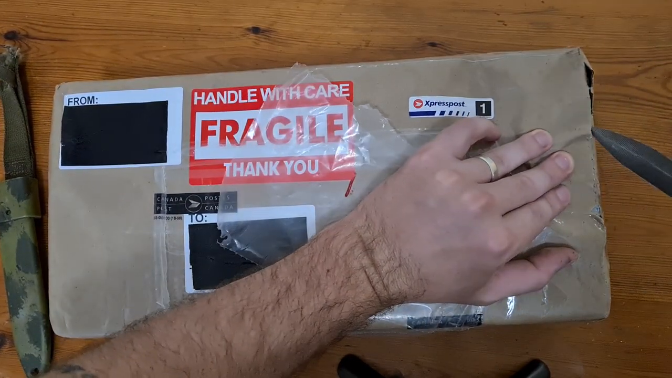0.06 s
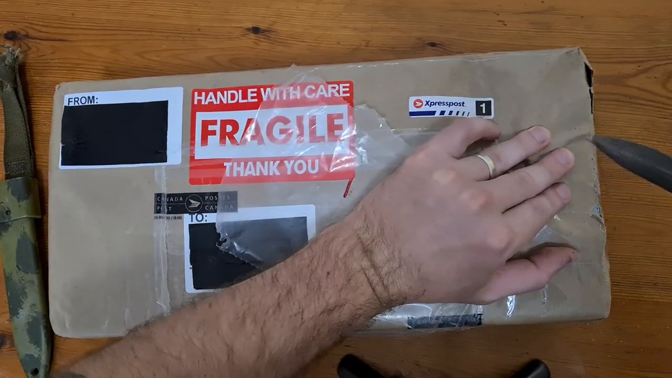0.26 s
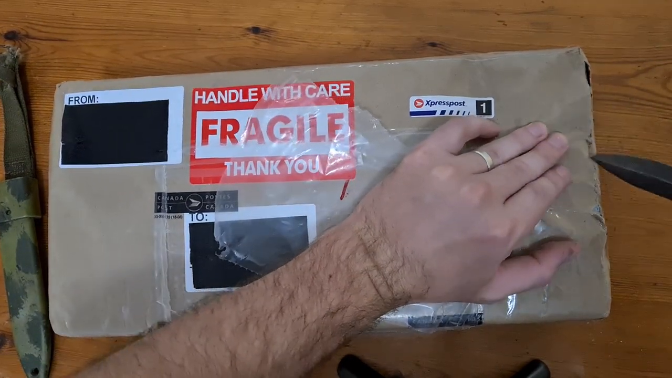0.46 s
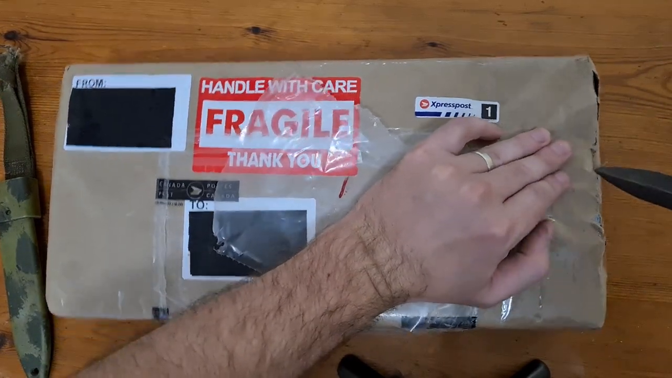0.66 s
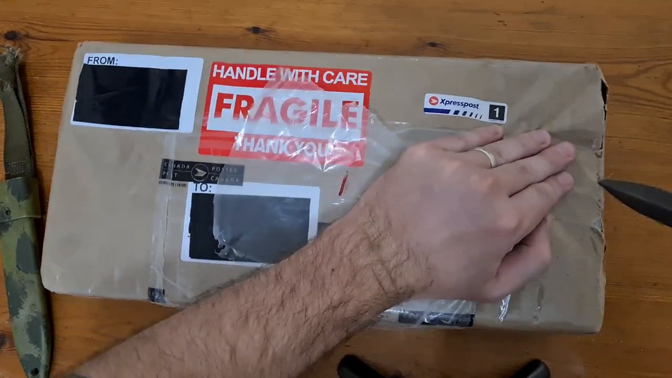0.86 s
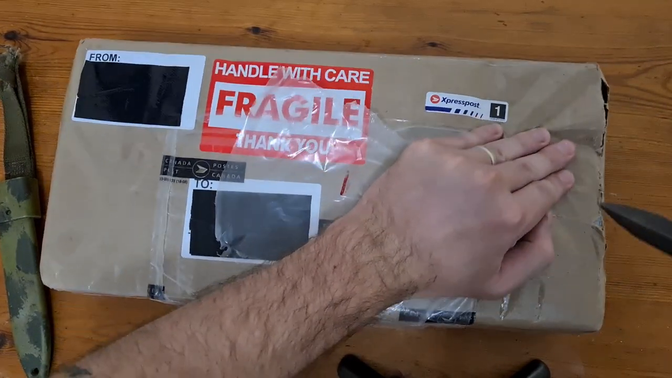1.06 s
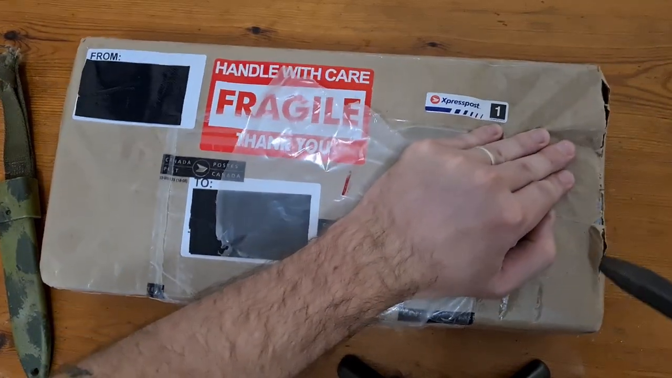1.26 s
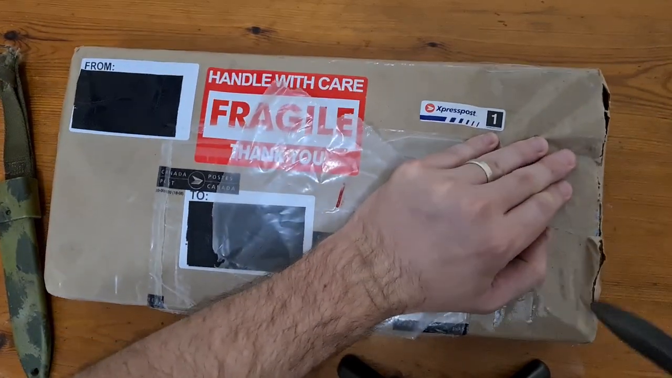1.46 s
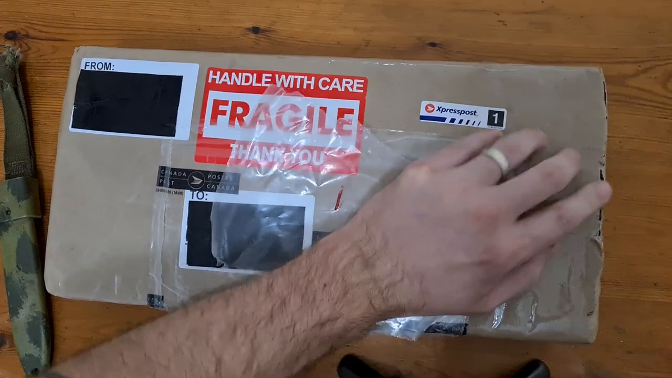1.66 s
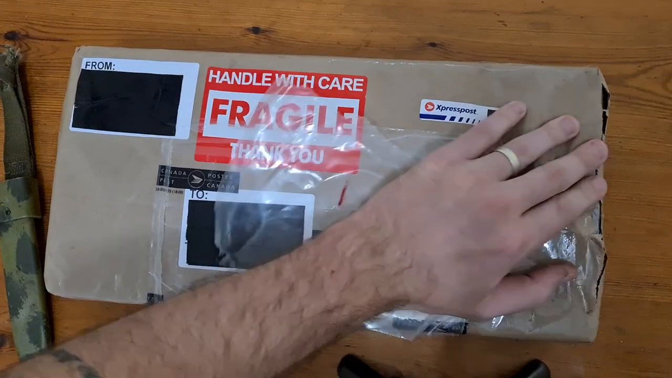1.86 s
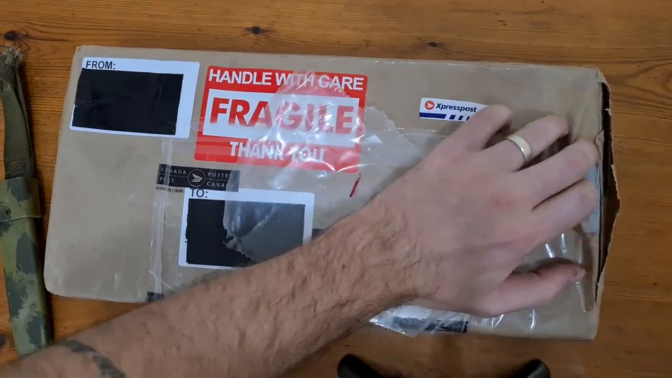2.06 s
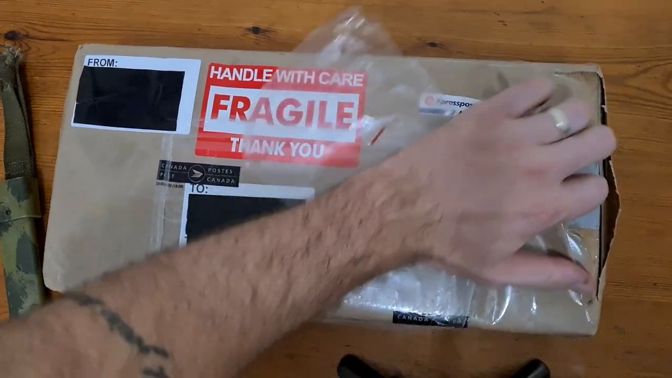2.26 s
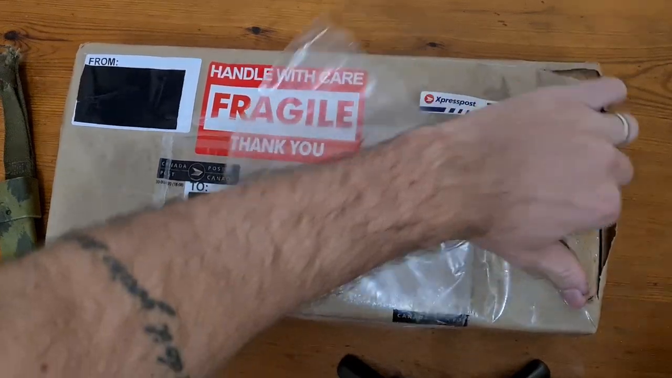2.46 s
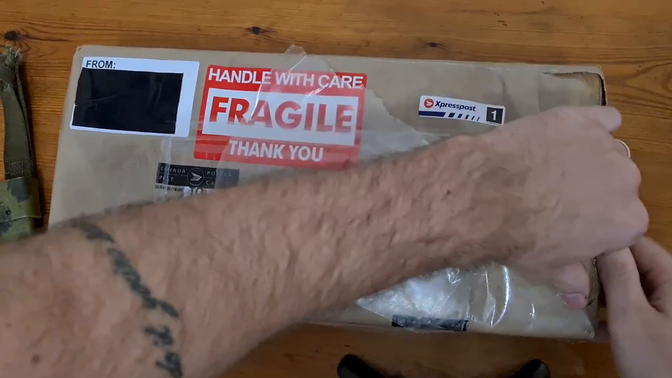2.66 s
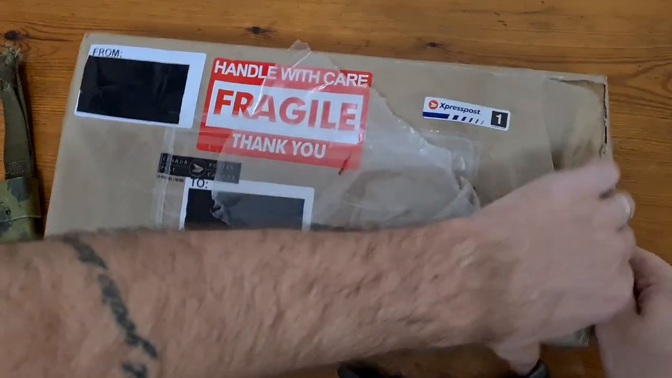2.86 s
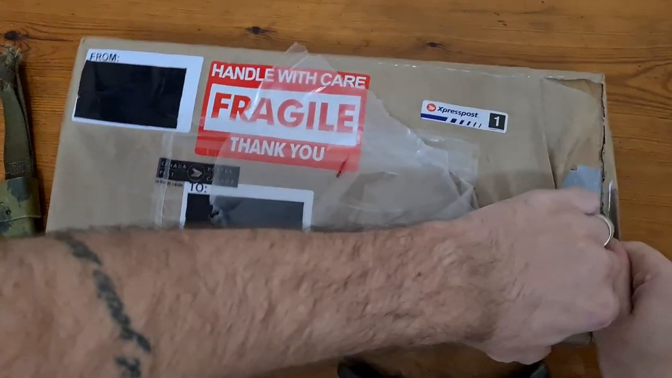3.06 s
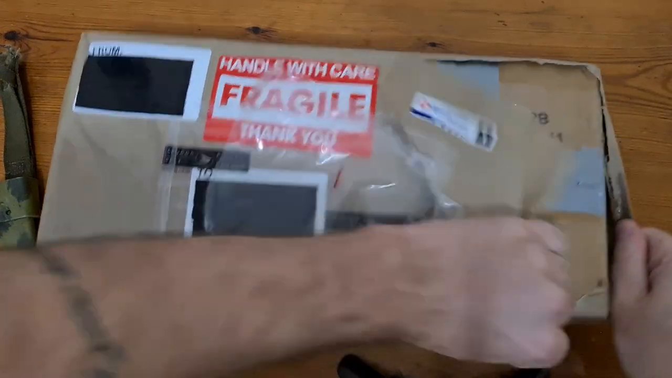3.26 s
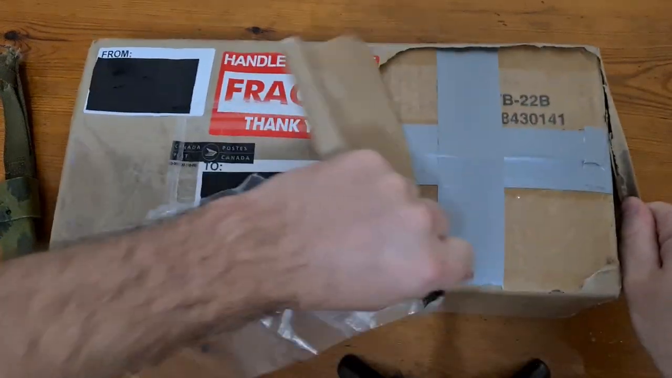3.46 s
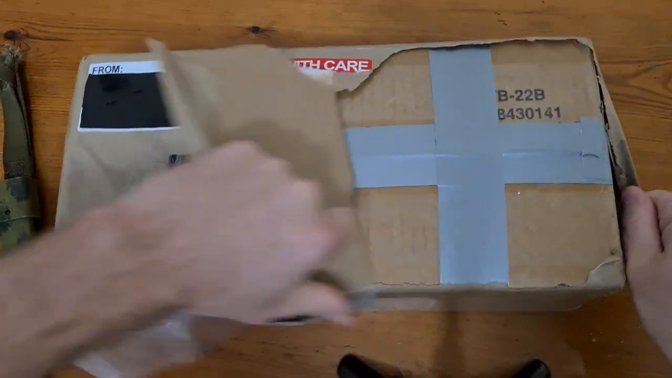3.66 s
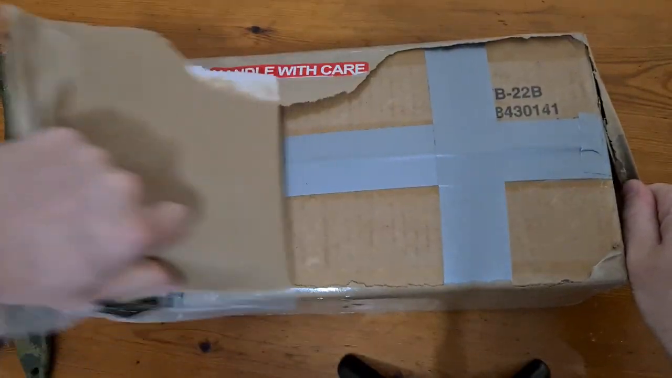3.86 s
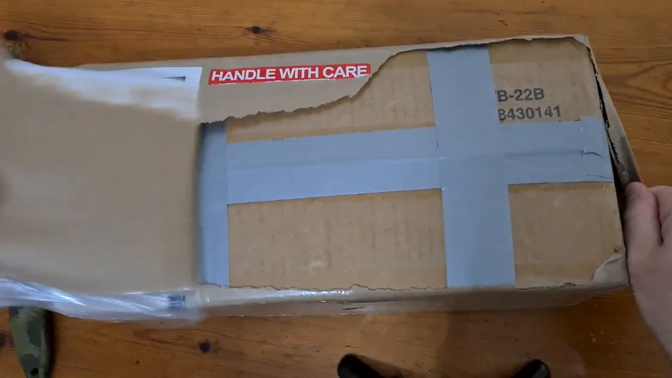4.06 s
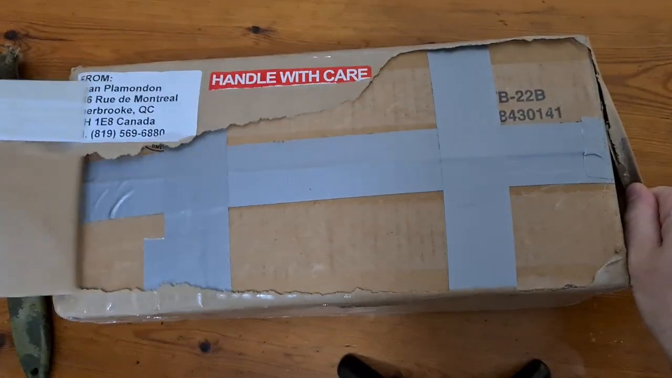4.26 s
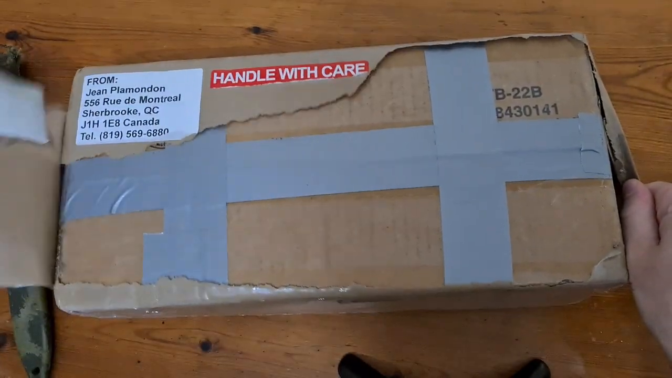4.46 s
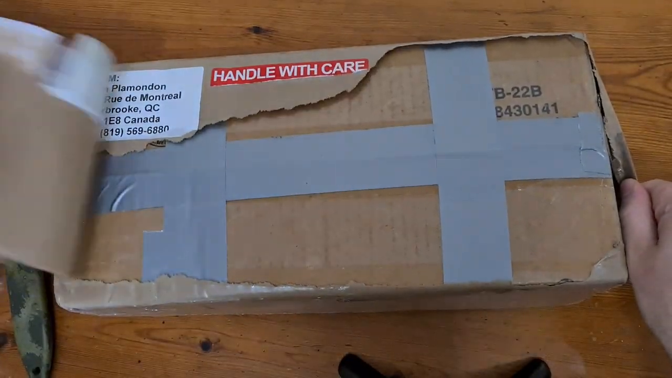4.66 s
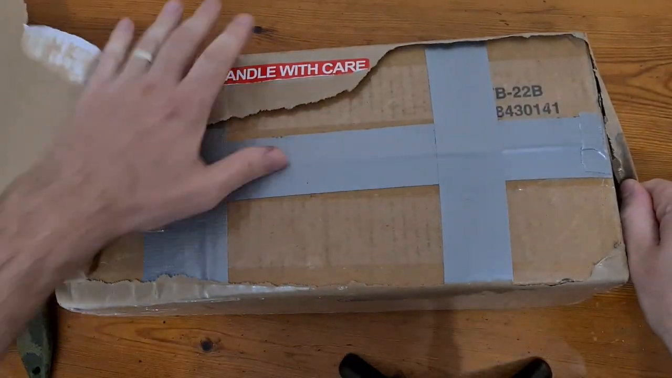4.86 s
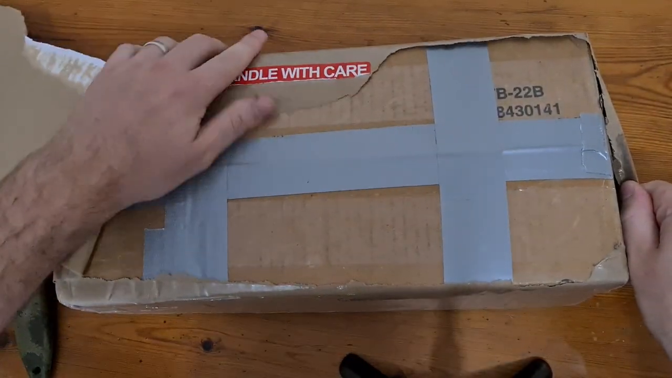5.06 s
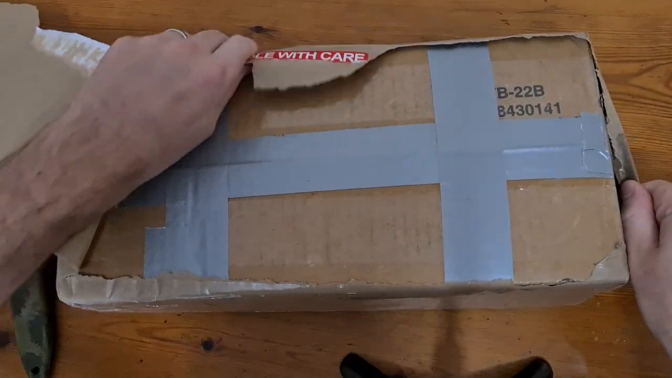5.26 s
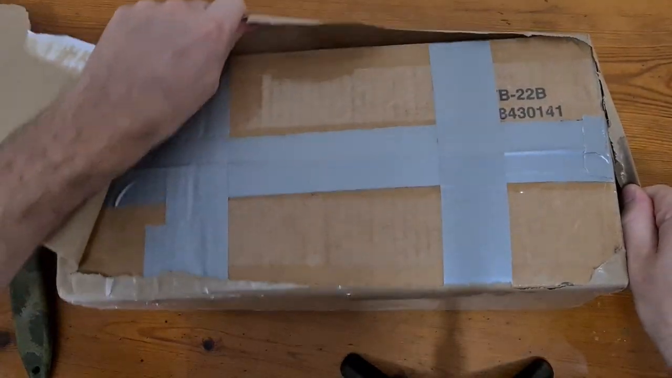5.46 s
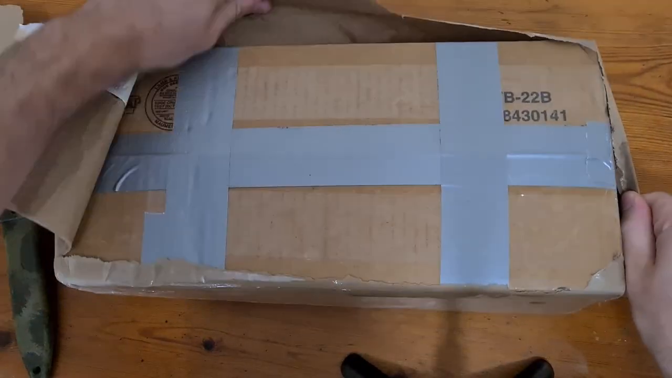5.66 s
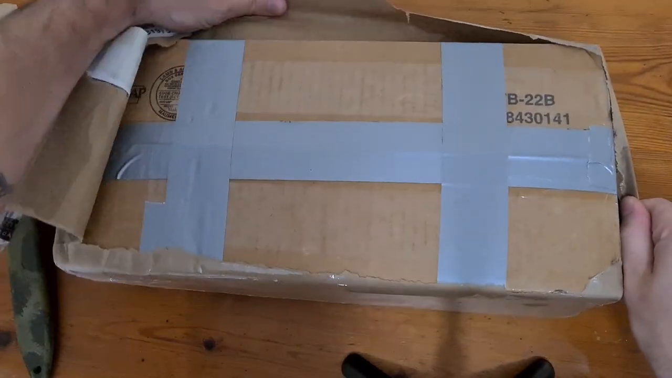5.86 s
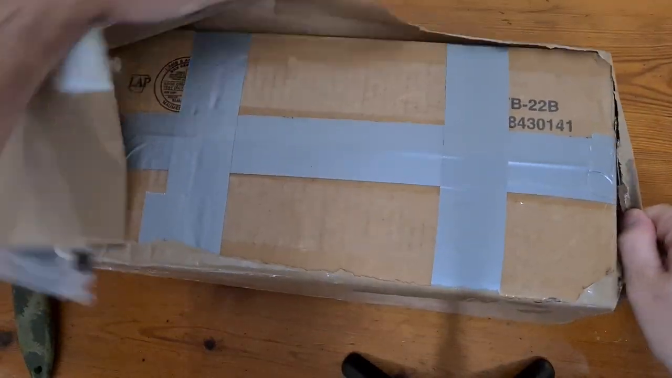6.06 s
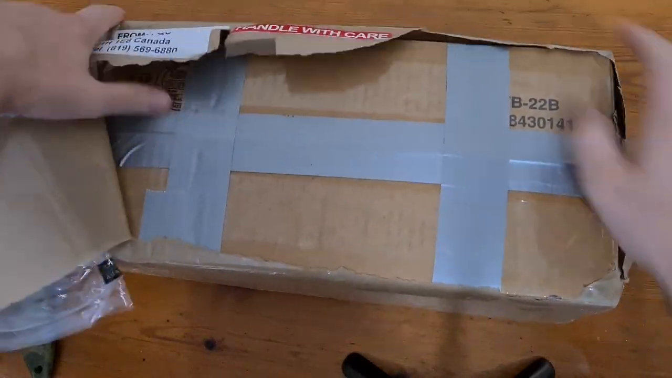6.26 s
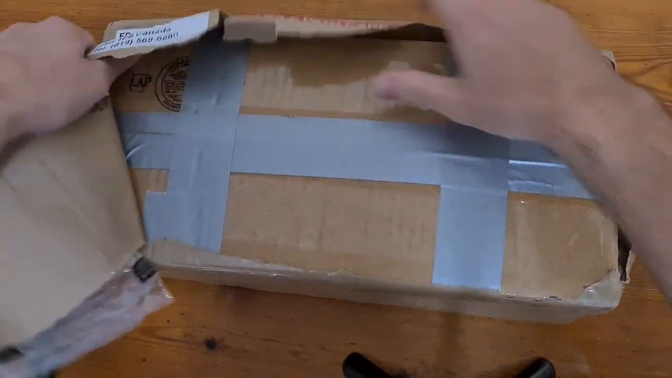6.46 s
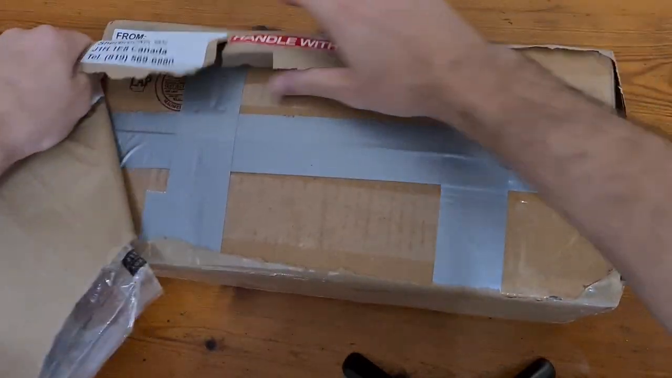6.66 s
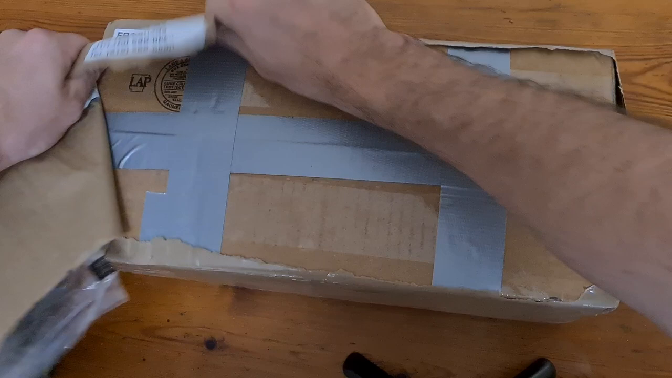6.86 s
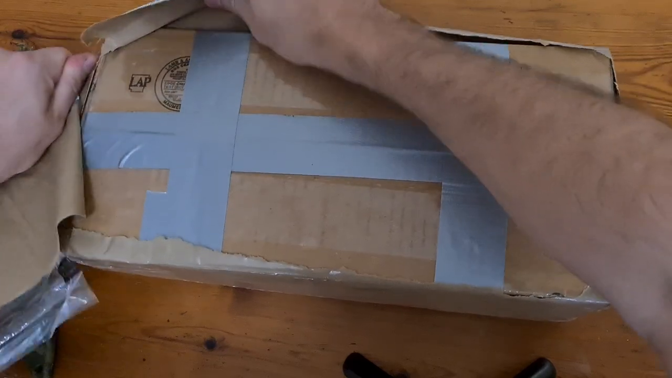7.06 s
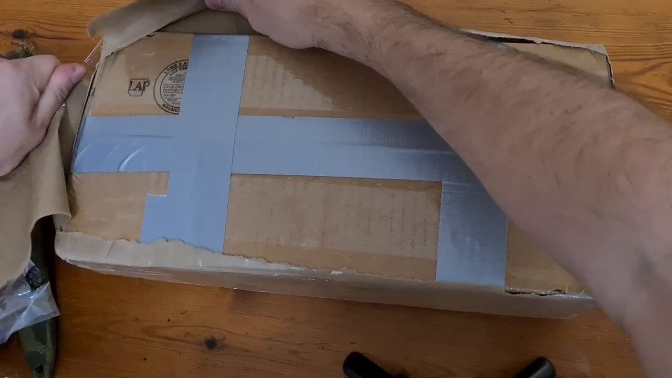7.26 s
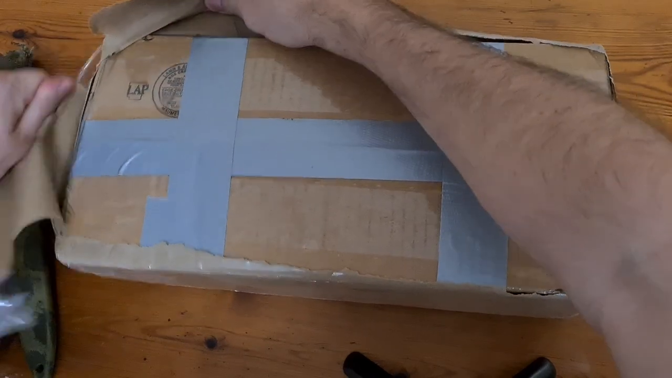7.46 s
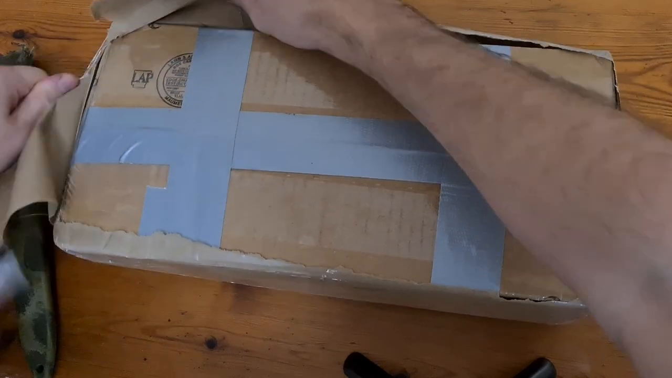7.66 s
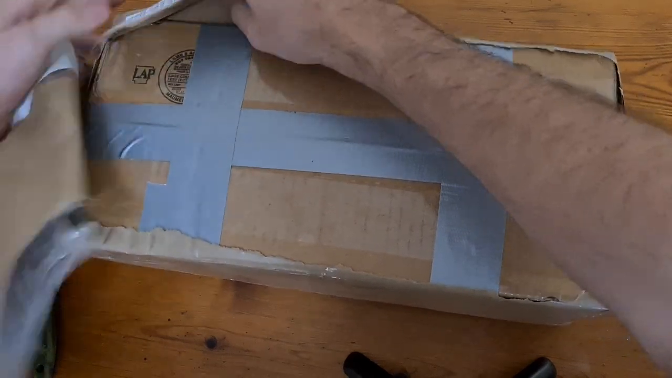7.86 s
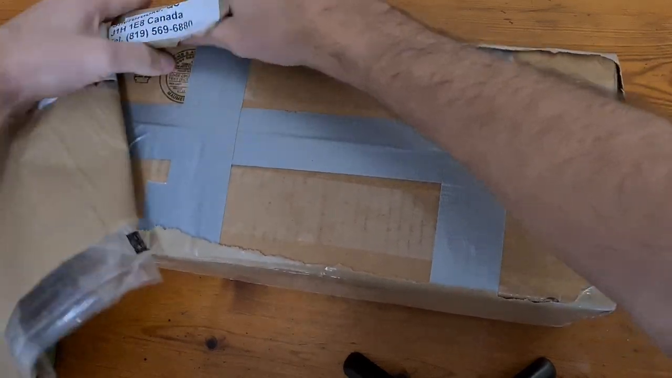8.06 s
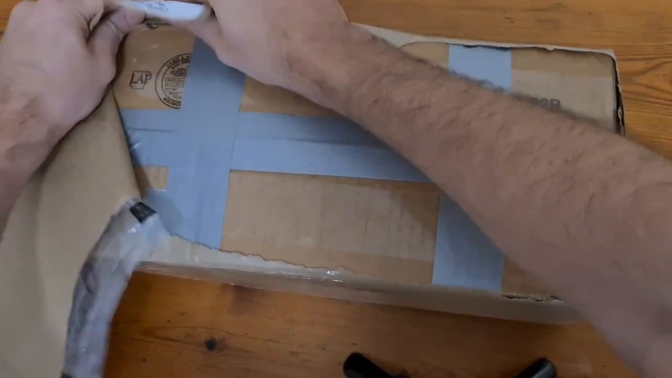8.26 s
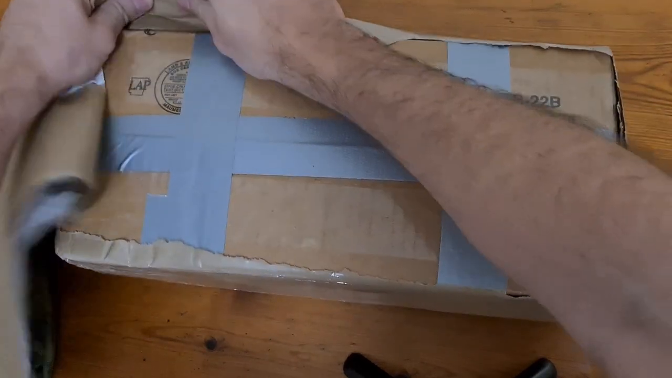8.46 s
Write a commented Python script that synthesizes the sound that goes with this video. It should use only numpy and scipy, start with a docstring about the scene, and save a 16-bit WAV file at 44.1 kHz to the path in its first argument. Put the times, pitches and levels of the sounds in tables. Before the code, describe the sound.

A small, quiet room with faint hush and short echo, heard close in stereo. From 0.3 to 1.1 s, very soft paper ticks and faint knocks. At about 1.27 and 1.5 s, brief crisp slitting cuts with sharp snaps and a low shift of the box. Light crinkles near 1.9 and 2.25 s. At 2.42 s a knife drops on the wooden table: a solid thump, quick bounces and rattle to 2.6 s, with small high steel clinks. Quiet rustle, then hard cracks from 3.13 s open into a long, loud, coarse paper rip, hissing and fluttering until 4.5 s over hollow box rumble. A quieter pause with slight rubbing follows. Short crumples and snaps burst at 5.3 to 5.6 s, smaller ones around 5.9 to 6.7 s. From 7.0 to 7.6 s dense, bright tape and paper cracks with tears and box bumps, then looser crackles at 7.9 and rustling past 8.3 s.

```python
"""A parcel in brown paper and tape is opened on a wooden table in a small room: creases crack, paper crackles.
A knife slits one end and is dropped on the table; the wrapping is ripped across the box in one long pull,
then gripped, creased and torn further in short bursts while the cardboard box bumps about.
Paper and tape are crowds of tiny ringing fractures; cracks, thumps and rubs are shaped noise and short
ringing tones; the box rumbles in low noise, and a faint hush and the room's echo surround it all."""
import sys
import numpy as np
from scipy import signal
from scipy.fft import rfft, irfft, next_fast_len
from scipy.io import wavfile
from scipy.ndimage import uniform_filter1d

SR = 44100
rng = np.random.default_rng(int(sys.argv[2]) if len(sys.argv) > 2 else 0)


def master_out(mix):
    """Clip the mix to full scale and print it as 16-bit PCM to the path in sys.argv[1]."""
    frames = np.transpose(np.atleast_2d(mix))
    ceiling = np.clip(frames, -1, 1)
    pcm = np.round(ceiling * 32767).astype(np.int16)
    wavfile.write(sys.argv[1], SR, pcm)


N = 375732  # length in samples

# All levels are relative: each source trims its own before mixing.
# Spectra. Each row: frequency in Hz, level in dB per Hz.
# The quiet room.
HUSH = [(12, -29), (20, -17), (58, -14), (91, -17), (422, -20.5), (698, -28.5), (2820, -31), (6720, -39),
        (9140, -41), (16000, -55)]
# The low rumble of the shifting box, and its hollow drumming.
RUMBLE = [(20, -41), (45, -23), (62, -3.5), (77, 10), (86, 3.5), (98, 5.5), (125, -3), (150, -22),
          (300, -40.5)]
DRUM = [(90, -40), (150, -24), (200, -2), (280, -12), (335, 2), (420, -5), (600, -17), (1000, -23)]
# Crinkling paper, crinkling plastic tape, the bending sheet, and a surface sliding.
CRINKLE = [(500, -23), (1200, 4.5), (2000, -6), (2700, 7.5), (3500, 9), (4800, -0.5), (7000, 6.5),
           (9000, -17.5), (16000, -3)]
TAPE = [(1500, -29), (3500, 0), (7000, 2), (10000, 6), (16000, 1.5)]
FLEX = [(90, -13.5), (170, -6.5), (340, -1.5), (500, -2), (750, -5), (900, -6.5), (1240, 3), (1600, -7.5),
        (2200, -7), (4000, -25.5)]
SLIDING = [(500, -30), (1200, -13), (2000, 6), (3500, 1), (6000, -1), (10000, -9), (16000, -21)]
# The sizzle on top of a crack.
SIZZLE = [(3000, -52), (6000, -0.5), (9000, 6.5), (16000, 2.5)]
# Coarse fibres, fine fibres and the fluttering flap in the long pull.
FIBRES = [(500, -10), (1500, -4.5), (2000, 1.5), (2700, -4.5), (3400, 2), (4800, -5), (6200, -3),
          (9000, -22)]
FINE_FIBRES = [(4000, -22), (5400, -5.5), (6300, 2.5), (7300, -1.5), (11000, 0), (16000, -5)]
FLUTTER = [(250, -32), (550, -15.5), (750, -1), (900, -0.5), (1100, 4.5), (1350, -0.5), (1700, -5.5),
           (2400, -9.5), (4000, -12)]

# Sound around a pitch. Each row: multiple of the pitch, level in dB per Hz.
# A crack, the pop of a panel, a rubbed panel, a thump on the table top, and a tear.
CRACK_SHAPE = [(.15, -38), (.42, -4.5), (.62, -3.5), (.85, -0.5), (1, 3), (1.25, -2.5), (2.2, -6.5),
               (3.2, -8.5), (6, -40.5)]
POP_SHAPE = [(.12, -16), (.3, -0.5), (.7, -4), (1, 4), (1.4, -7.5), (2.2, -16.5), (4, -38)]
RUB_SHAPE = [(.4, -6), (.75, 1.5), (1, 6), (1.4, -6.5), (2.4, -25.5)]
WOOD = [(.12, -19), (.3, -2), (.55, -15), (1, 1.5), (1.35, -10), (1.9, -9), (3, -12.5), (5, -16.5),
        (10, -38), (20, -44), (40, -72)]
TEAR_SHAPE = [(.15, -18), (.4, -12), (.75, 0), (1, -1), (1.35, -10), (2.2, -8.5), (5, -19)]

# Ringing tones of the box, table and blade.
# Each row: frequency in Hz, level in dB, time to fade by 60 dB in seconds.
BOX = [(76, -13, 0.124), (124.4, 3, 0.13), (180, -2, 0.23), (243.5, 3.5, 0.15), (338, 0, 0.21),
       (402, 21, 0.018), (560, -3.5, 0.2)]
TABLE = [(92, -6, .14), (198, -5, 0.16), (253, -6, 0.18), (413, -4, 0.16), (450, -6, 0.15), (598, -8, 0.1),
         (781, -7, 0.13), (845, -5, 0.15), (1010, -10, 0.19), (1094, -9, 0.17)]
BLADE = [(1879, -9, .13), (2519, -15, .15), (3085, -13, .22), (3620, -18, .12), (4011, -13, .15),
         (4560, -16, .09), (4980, -11, .06)]

# Hands knocking the hollow box. Each row: start in seconds, level in dB, pitch of the struck panel in Hz.
KNOCKS = [(0.344, -51, 372), (0.439, -59, 350), (0.514, -47.5, 328), (0.971, -42.5, 305), (1.093, -44, 244),
          (1.703, -40, 310), (1.75, -34.5, 88), (2.25, -33.5, 143), (3.24, -25, 290), (3.385, -27, 372),
          (3.51, -24.5, 400), (4.236, -28, 343), (4.961, -47, 119), (5.202, -45.5, 248), (5.319, -28, 239),
          (5.587, -30.5, 604), (6.15, -28, 420), (6.604, -34.5, 563), (6.719, -33, 576), (7.0, -28, 425),
          (7.931, -35, 420), (8.118, -37, 190), (8.24, -42, 346)]
# The box is shoved over the table. Each row: start in seconds, length in seconds, level in dB.
SHOVES = [(.5, 0.066, -51.5), (.97, 0.029, -51), (1.27, 0.095, -39), (1.54, 0.037, -41),
          (1.755, 0.0068, -40), (1.86, 0.0082, -44.5), (2.26, 0.06, -61), (2.46, 0.1, -38),
          (2.95, 0.025, -48), (3.27, 0.21, -33.5), (3.53, 0.016, -28), (4.2, 0.088, -39.5),
          (4.58, 0.024, -49.5), (5.32, 0.025, -46), (6.35, 0.039, -53), (7.05, 0.046, -48),
          (8.11, 0.028, -47)]
# Taut tape and stiff creases cracking.
# Each row: time in seconds, level in dB, pitch in Hz, treble in dB relative to the crack.
CRACKS = [(.258, -48, 3500, -26), (.302, -38.5, 3500, -14), (.342, -35.5, 6000, -6), (.389, -35, 4100, -9),
          (.397, -29.5, 6500, -11), (.428, -48.5, 4400, -13), (.452, -40, 3670, -22),
          (.479, -34, 6200, -29), (.527, -29.5, 6250, -10), (.597, -47, 3000, -22), (.612, -38, 3280, -15),
          (.842, -45, 4500, -6), (.848, -40.5, 4360, 3), (.893, -39, 3500, -23), (.926, -35.5, 4630, -20),
          (.941, -52, 4500, -10), (.955, -36, 3600, -17), (.972, -43, 3480, -5), (1.059, -41, 3540, -6.5),
          (1.211, -46, 4500, -12), (1.258, -15, 3540, -18), (1.285, -15, 6550, -25),
          (1.534, -25.5, 6200, -13), (1.621, -26, 5600, -29), (1.631, -24, 3460, -13),
          (1.908, -27, 3000, -28), (2.059, -29.5, 6260, -18), (2.266, -20, 4900, -8.5),
          (2.323, -24.5, 6400, -13), (2.826, -29.5, 1960, -15), (2.875, -29.5, 6170, -9),
          (2.948, -34.5, 1960, -3), (2.989, -23, 4480, -0.5), (3.098, -29, 1900, -3),
          (3.133, -12, 4350, -10), (3.141, -24.5, 4200, -1), (3.19, -11, 3080, -15),
          (3.217, -7.5, 5960, -12), (3.239, -3.5, 3690, -14), (3.251, -3.5, 3630, -15),
          (3.263, -12, 3960, 1.5), (3.284, -13, 2600, -4), (3.312, -4, 5480, -31), (3.457, -10, 6200, -26),
          (3.487, -16, 6850, -19.5), (3.51, -7.5, 6020, -24), (3.557, -7.5, 6200, -28),
          (4.169, -4, 6250, -14), (5.246, -23.5, 3000, -37), (5.309, -14.5, 1710, -31),
          (5.32, -5.5, 4730, -30), (5.436, -6.5, 2550, -18), (5.587, -8.5, 3200, -31),
          (5.618, -11, 3280, -29.5), (6.097, -28, 7120, 0.5), (6.287, -16, 6690, -28),
          (6.722, -16.5, 6100, -12), (7.021, -10, 5470, -4.5), (7.046, -10, 6100, -6.5),
          (7.072, -4.5, 3270, -14), (7.089, 0, 8000, -29), (7.175, -13.5, 3520, -4),
          (7.184, -16, 3400, -14.5), (7.2, -4.5, 3330, -10.5), (7.235, -12.5, 3400, -15.5),
          (7.267, -8.5, 2000, -7), (7.346, -24, 3290, -5.5), (7.394, -10, 5100, -11.5),
          (7.422, -29, 5800, -7), (7.433, -24, 3550, 0.5), (7.447, -8.5, 3580, -9), (7.46, -6, 3580, -18.5),
          (7.486, -24, 3480, -22), (7.496, -15, 3500, -26), (7.509, -12, 3280, -20.5),
          (7.516, -9.5, 3560, -15.5), (7.526, -9.5, 3540, -15), (7.553, -11, 5750, -8),
          (7.563, -8.5, 2090, -6.5), (7.567, -10.5, 3470, -4.5), (7.587, -7.5, 3540, -10.5),
          (7.78, -26, 3460, -12.5), (7.84, -41, 3300, -15), (7.852, -23.5, 6000, -10),
          (7.877, -12, 4800, -24), (7.894, -12.5, 3560, -19), (7.932, -18, 3330, -27.5),
          (8.029, -23.5, 3460, -5), (8.373, -13.5, 3120, -12), (8.46, -13, 6560, -12)]
# Paper panels buckling. Each row: time in seconds, level of the pop in dB, pitch of the pop in Hz.
BUCKLES = [(0.6615, -51, 1290), (.787, -56.5, 1830), (1.099, -47.5, 1150), (1.397, -45, 1260),
           (1.4921, -36, 1260), (1.702, -41.5, 1170), (2.2418, -33, 1330), (2.3511, -30, 2330),
           (2.94, -43.5, 1030), (3.018, -40.5, 1090), (3.0976, -46.5, 394), (3.6177, -24, 1420),
           (3.834, -28.5, 1050), (3.895, -23.5, 1050), (4.137, -21, 1070), (4.181, -25, 1030),
           (4.598, -35.5, 1050), (4.9884, -45, 1750), (5.202, -38.5, 1270), (5.436, -22, 1370),
           (5.4586, -27, 900), (5.692, -36.5, 905), (5.78, -36.5, 2050), (5.814, -41, 1400),
           (5.843, -41, 1220), (5.943, -22, 1177), (6.1319, -29, 1020), (6.15, -32, 1230),
           (6.288, -33.5, 580), (6.61, -37, 710), (6.722, -43.5, 696), (6.977, -49, 1180),
           (7.003, -34, 1080), (7.089, -31.5, 880), (7.268, -25.5, 1140), (7.379, -41, 1160),
           (7.5701, -19.5, 1264), (7.802, -48.5, 1300), (7.823, -35, 1320), (7.9176, -31.5, 1130),
           (7.932, -26, 605), (8.224, -32, 1290), (8.241, -24.5, 1166), (8.325, -33, 1190),
           (8.349, -25.5, 1200), (8.511, -29, 1170)]
# A hand or the blade moves over the wrapping. Each row: start in seconds, length in seconds,
# paper crinkle in dB, sheet flexing in dB, plastic tape in dB.
STROKES = [(.33, 0.31, -63, -61, -64), (.85, 0.1, -63, -58.5, -72), (.97, 0.1, -78, -54.5, -55),
           (1.272, 0.029, -35, -31, -33), (1.49, 0.067, -56, -39, -37.5), (1.59, 0.047, -63, -48.5, -40.5),
           (1.69, 0.061, -72, -68, -74), (1.89, 0.023, -44.5, -48, -60), (2.15, 0.038, -42, -49, -40),
           (2.24, 0.18, -33.5, -36.5, -36), (2.56, 1, -54, -57, -64.5), (2.87, .34, -45, -53, -52),
           (4.53, 0.1, -40.5, -42.5, -62), (4.68, 0.14, -51.5, -53, -61), (4.96, 0.057, -47, -45.5, -77),
           (5.03, 0.22, -51.5, -57.5, -63), (5.25, 0.065, -40, -50, -62.5), (5.32, 0.01, -27, -27, -49.5),
           (5.41, 0.078, -30, -29, -39.5), (5.585, 0.032, -36, -33.5, -51), (5.735, 0.031, -37, -34.5, -37),
           (5.79, .33, -41.5, -42.5, -51.5), (6.15, 0.048, -37.5, -36, -34.5),
           (6.24, 0.045, -38, -40.5, -45), (6.33, 0.236, -48, -50.5, -49), (6.6, 0.11, -40.5, -41.5, -46),
           (6.76, 0.18, -40.5, -47.5, -45), (6.98, 0.15, -44.5, -32, -29), (7.19, 0.076, -26, -43, -30),
           (7.44, 0.071, -36, -71, -21), (7.56, 0.086, -43.5, -38, -30), (7.77, 0.18, -41, -39, -39),
           (7.87, 0.043, -50, -30, -33.5), (7.99, 0.31, -46.5, -47, -48.5),
           (8.19, 0.055, -35, -37.5, -32.5), (8.33, 0.48, -41.5, -38.5, -40)]
# A palm drags over the hollow box.
# Each row: start in seconds, length in seconds, level in dB, pitch of the rubbed panel in Hz.
RUBS = [(.99, 0.067, -60, 330), (4.564, 0.019, -42.5, 527), (4.682, 0.15, -67, 400),
        (4.959, 0.014, -55, 300), (5.038, 0.18, -55, 340), (5.217, .08, -52, 298), (5.573, 0.092, -39, 540),
        (5.69, 0.2, -52, 400), (6.16, 0.06, -43.5, 254), (7.893, 0.029, -38, 557)]
# The knife touches the box, then lands on the table and rocks. Each row: time in seconds, wood in dB,
# pitch of the thump in Hz, steel in dB, ring of the tip in dB, pitch of the tip in Hz.
DROP = [(1.099, -68, 400, -58, -43, 6550), (2.415, -11, 450, -50, -60, 6520),
        (2.426, -15.5, 219, -28, -45, 6520), (2.432, -13, 480, -16.5, -19, 6540),
        (2.442, -16.5, 660, -26.5, -30, 6520), (2.487, -19.5, 440, -29, -55, 6520),
        (2.509, -16, 243, -36, -55, 6520), (2.520, -14.5, 258, -24, -42, 6520),
        (2.556, -17, 476, -22.5, -25, 6240), (2.625, -32.5, 430, -53, -48, 6240)]
# The handle rattles on the table between the bounces. Each row: time in seconds, level in dB.
RATTLE = [(2.418, -30.5), (2.48, -30.5), (2.52, -36), (2.58, -42.5), (2.62, -56)]
# Short cuts, tears and crumples. Each row: start in seconds, length in seconds, level in dB, pitch in Hz.
TEARS = [(1.278, 0.066, -36, 3920), (1.48, 0.062, -37.5, 5640), (1.482, 0.029, -42, 1390),
         (1.591, 0.054, -52, 5000), (3.231, 0.03, -31, 3880), (3.654, 0.068, -25, 3450),
         (4.205, 0.025, -21, 6530), (4.287, 0.055, -24, 3550), (5.403, 0.032, -25, 3250),
         (5.415, 0.082, -40, 1400), (5.591, 0.018, -34, 2100), (5.736, 0.057, -40, 2300),
         (6.979, 0.012, -27.5, 5600), (7.041, 0.023, -25.5, 6200), (7.064, 0.066, -30.5, 3080),
         (7.204, 0.062, -32.5, 2860), (7.283, 0.043, -45, 2290), (7.484, 0.046, -44, 3700),
         (7.564, 0.056, -30, 3100), (7.886, 0.049, -51.5, 2320)]
# The long pull. Each row: time in seconds, effort in dB, fine fibres in dB relative to the effort.
PULL = [(3.22, -25, -19), (3.25, -16.5, -7), (3.35, -27, -3.5), (3.41, -29, -9), (3.47, -20, -6.5),
        (3.62, -22, -1.5), (3.72, -22, -1.5), (3.9, -23, 2.5), (4.1, -21.5, 4), (4.2, -19, 1.5),
        (4.33, -18.5, -1), (4.41, -24, 2), (4.47, -23, -2.5), (4.52, -54, -4)]
# The freed flap's ring. Each row: time in seconds, pitch in Hz, flutter in dB relative to the pull.
FLAP = [(3.25, 1375, -9.5), (3.54, 1510, -15), (3.62, 1245, -1.5), (3.8, 1180, 2), (4.1, 1065, 0.5),
        (4.15, 1115, 2.5), (4.25, 1180, -8.5), (4.33, 1144, -8)]
# The tear crosses an end of the box, which drums harder; heard only for times within the pull.
# Each entry: time in seconds.
EDGES_S = [2.4, 4.33]
# How alike left and right are. Each row: frequency in Hz, likeness (1 is identical).
ALIKE = [(100, 0.96), (300, 0.98), (600, 0.8), (1200, 0.059), (3000, 0.02), (10000, 0.072)]
# The room's echo. Each row: frequency in Hz, time to fade by 60 dB in seconds.
ROOM = [(100, 0.79), (500, 0.44), (2000, 0.53), (6500, 0.37), (14000, 0.36)]
# Colour of the microphone. Each row: frequency in Hz, gain in dB.
MICROPHONE = [(100, 0.5), (4800, 0), (6500, 2.5), (7200, -1), (8200, -7), (9700, -8.5), (12500, -3.5),
              (16000, -6)]

HUSH_DB = -61.5
TOP_HZ = 16150  # nothing is kept from here up
# box rumble relative to the flexing sheet, relative to the pull, and under a resting hand
SHAKE_BY_HAND_DB, SHAKE_BY_PULL_DB, REST_DB = -24, -28.5, -62
# seconds for a move to swell by 60 dB, and to fade by 60 dB
SHOVE_ATTACK_S, SHOVE_T60_S = 0.12, 0.17
STROKE_ATTACK_S, STROKE_T60_S = 0.12, 0.086
CRACK_RISE_S = 0.0011  # for a 0 dB crack at 3.5 kHz; duller ones take longer, small ones are quicker
CRACK_POP_DB, CRACK_POP_HZ = -25.5, 1330  # the panel's pop relative to the crack, and its middle pitch
# the fold's dull crack relative to the pop, its pitch, and its sizzle relative to that crack
BUCKLE_CRACK_DB, BUCKLE_CRACK_HZ, BUCKLE_TREBLE_DB = 7, 1930, -16
TIP_T60_S = 0.19  # time for the knife tip's ring to fade by 60 dB
DRUM_DB, EDGE_DB, EDGE_WIDTH_S = -14, 9.5, 0.049  # drumming in the pull, its boost at an edge, the boost's width
MOVE_S = 0.3  # time in which the moving hands change the room's paths


def amp(db):
    """Turn decibels into a plain multiplier."""
    return 10 ** (np.asarray(db) / 20)


def unit(x):
    """Scale a sound to an average (rms) level of 1."""
    return x / np.sqrt(np.mean(x ** 2) + 1e-20)


def along(points, hz):
    """Read a (Hz, value) table at any frequency, on a log axis."""
    f, v = np.transpose(points)
    return np.interp(np.log(hz + 1), np.log(f + 1), v)


def around(shape, pitch):
    """Turn a spectrum given in multiples of a pitch into one in Hz."""
    return [(multiple * pitch, db) for multiple, db in shape]


def gains(rows):
    """One gain per sample for each dB column; silent outside the rows."""
    s, *cols = np.transpose(rows)
    t = np.arange(N) / SR
    inside = (t >= s[0]) & (t <= s[-1])
    gate = uniform_filter1d(inside * 1.0, size=400)
    return [gate * amp(np.interp(t, s, c)) for c in cols]


def gestures(rows, attack_s, t60):
    """One gain per sample for each dB column of (start, length, dB, ..): moves swell, hold and die away."""
    power = np.zeros((len(rows[0]) - 2, N))
    t = np.arange(-SR // 5, 3 * SR // 5) / SR  # a move is cut off 0.6 s after its start
    for s, length, *db in rows:
        swell_db = 60 * np.minimum(t, 0) / attack_s
        fade_db = 60 * np.maximum(t - length, 0) / t60
        add(power, s + t[0], (amp(db)[:, None] * amp(swell_db - fade_db)) ** 2)
    return np.sqrt(power)


def add(track, s, sound):
    """Mix a sound into the track at time s."""
    part = track[:, max(round(s * SR), 0):][:, :sound.shape[-1]]
    part += sound[..., :part.shape[1]]


def pan(db):
    """Gains that make the left louder than the right by this many dB."""
    return amp([[db / 2], [-db / 2]])


def noise(spectrum, n=N):
    """Coloured stereo noise of rms 1, most alike left and right in the bass."""
    m = next_fast_len(n)
    hz = np.fft.rfftfreq(m, 1 / SR)
    turn = np.arccos(np.clip(along(ALIKE, hz), -1, 1)) / 2
    coloured = rfft(rng.standard_normal((2, m))) * amp(along(spectrum, hz))
    mid, side = irfft(coloured * [np.cos(turn), np.sin(turn)], m)[:, :n]
    return unit(np.array([mid + side, mid - side]))


def grains(rate, spread_db, t60, n=N):
    """Envelope of rms 1: tiny fractures of uneven size at random moments (rate per second), each dying fast."""
    happens = rng.random(n) < rate / SR
    size = amp(spread_db * np.minimum(rng.standard_normal(n), 2)) * happens
    power = signal.lfilter([1], [1, -amp(-60 / (t60 * SR)) ** 2], size ** 2)
    return unit(np.sqrt(power))


def crackle(spectrum, rate, spread_db, cycles, n=N, bend=np.ones_like):
    """Stereo crackle of rms 1: fractures ring briefly at their own pitch, size and place; bend(s) scales pitch."""
    draw = rng.random((int(rate * n / SR), 6))
    start = (draw[:, 0] * n).astype(int)
    # pitches are drawn in proportion to the energy of the spectrum
    grid = np.geomspace(100, TOP_HZ, 400)
    share = np.cumsum(amp(along(spectrum, grid)) ** 2 * grid)
    hz = np.interp(draw[:, 1], share / share[-1], grid) * bend(start / SR)
    size = amp(spread_db * np.minimum(-np.log(1 - draw[:, 2]), 3)) * np.sqrt(hz)
    life = (2 * np.pi * cycles * SR / hz).astype(int) + 1  # in samples
    # lay all fractures end to end: k says which one a sample belongs to
    k = np.repeat(np.arange(len(hz)), life)
    age = np.arange(len(k)) - (np.cumsum(life) - life)[k]
    turns = age * hz[k] / SR
    body = size[k] * turns * np.exp(-turns / cycles)
    lead = hz * 0.00025 * draw[:, 4]  # cycles by which the left microphone leads
    ears = []
    for side in (1, -1):
        loudness = 1 + side * (draw[:, 5] - 0.5)
        phase = draw[:, 3] + side * lead / 2
        ear = loudness[k] * body * np.sin(2 * np.pi * (turns + phase[k]))
        ears.append(np.bincount(start[k] + age, ear, n)[:n])
    return unit(np.array(ears))


def bending(x, depth_db):
    """The sheet keeps changing shape, so its resonances come and go."""
    z = signal.stft(x, nperseg=512)[2]
    field = rng.standard_normal(z.shape[1:])
    for axis in (0, 1):
        field = uniform_filter1d(field, size=7, axis=axis)
    bent = z * unit(amp(depth_db * unit(field)))
    return signal.istft(bent, nperseg=512)[1][:, :x.shape[1]]


def ring(modes, t, scatter_db=1.0):
    """Fading tones of a struck object, at new strengths each time."""
    out = 0
    for hz, db, t60 in modes:
        level = amp(db + scatter_db * rng.standard_normal() - 60 * t / t60)
        out = out + level * np.sin(2 * np.pi * hz * t) * rng.choice([-1, 1])
    return out


def box(flexing):
    """The hollow box rumbles as it shifts, and thuds under the hands; large, low panels ring longest."""
    sway = noise(RUMBLE)
    swing = np.abs(signal.hilbert(sway, next_fast_len(N))[:, :N])
    heave = unit(sway / (swing + 0.86))  # the box sways with a fairly even stroke
    shoved, = gestures(SHOVES, SHOVE_ATTACK_S, SHOVE_T60_S)
    shaken = amp(SHAKE_BY_HAND_DB) * flexing + amp(SHAKE_BY_PULL_DB) * gains(PULL)[0]
    out = np.sqrt(shoved ** 2 + shaken ** 2 + amp(REST_DB) ** 2) * heave
    t = np.arange(SR // 4) / SR
    for s, db, hz in KNOCKS:
        panel = amp(9.5 - 60 * t * hz / 26) * np.sin(2 * np.pi * hz * t)
        drum = amp(6.0 - 60 * t / 0.036) * noise(DRUM, len(t))
        thud = amp(-8.0) * ring(BOX, t) + panel + drum
        add(out, s, amp(db - 7.0) * thud * (1 - np.exp(-t / 0.001)))
    return out


def snaps():
    """A crease strains, then buckles with a crack; the panel beside it pops for a few cycles."""
    out = np.zeros((2, N))
    n, ahead = SR // 25, SR // 100
    since = (np.arange(n) - ahead) / SR  # seconds since the buckle
    t = np.maximum(np.arange(n) - ahead, 0) / SR
    strain = amp(-13.5) * np.exp(-np.abs(since) / 0.0036)  # the first fibres yield just before the buckle

    def burst(rise):
        return t / rise * np.exp(1 - t / rise) + strain

    events = []
    for s, db, hz, treble_db in CRACKS:
        pop_hz = CRACK_POP_HZ * np.exp(0.147 * rng.standard_normal())
        events.append((s, db, hz, treble_db, CRACK_POP_DB, pop_hz))
    for s, db, hz in BUCKLES:
        events.append((s, db + BUCKLE_CRACK_DB, BUCKLE_CRACK_HZ, BUCKLE_TREBLE_DB, -BUCKLE_CRACK_DB, hz))
    for s, db, crack_hz, treble_db, pop_db, pop_hz in events:
        crack = amp(-9.0) * noise(around(CRACK_SHAPE, crack_hz), n)
        crack += amp(treble_db + 2.5) * noise(SIZZLE, n)
        tone = np.sin(2 * np.pi * pop_hz * t)
        panel = amp(-3.0) * tone + amp(-3.5) * noise(around(POP_SHAPE, pop_hz), n)
        rise = CRACK_RISE_S * (3500 / crack_hz) ** 0.098 * amp(db) ** 0.08
        snap = amp(0.5) * crack * burst(rise) + amp(pop_db + 4.5) * panel * burst(0.0016)
        add(out, s - ahead / SR, amp(db) * snap * pan(-2.5 + 1.3 * rng.standard_normal()))
    return out


def handling(crinkle, flexing, plastic):
    """Sliding paper hisses, small creases tick, tape crinkles, and the sheet flexes with duller crumples."""
    # the fingers hold and slip, so creases come in clumps
    grip = uniform_filter1d(grains(rate=150, spread_db=6.5, t60=0.055), size=250)
    ticks = amp(-7.0) * crackle(CRINKLE, rate=900, spread_db=2.0, cycles=0.93)
    crumples = amp(-3.5) * crackle(FLEX, rate=1100, spread_db=3.5, cycles=1.44)
    tape = amp(-0.5) * crackle(TAPE, rate=1100, spread_db=2.0, cycles=0.98)
    paper = crinkle * (grip * ticks + amp(-11.0) * noise(SLIDING))
    bright = paper + plastic * grip * tape
    dull = flexing * (grip * crumples + amp(-10) * noise(FLEX))
    return bright * pan(-5.0) + dull * pan(-0.22)


def rubs():
    """Skin sticks and slips on the papered box; each slip is a soft bump of the panel."""
    out = np.zeros((2, N))
    t = np.arange(SR // 3) / SR
    for s, length, db, hz in RUBS:
        press = np.minimum(t / 0.004, 1) * amp(-60 * np.maximum(t - length, 0) / 0.06)
        slips = grains(rate=130, spread_db=3, t60=0.05, n=len(t))
        add(out, s, amp(db) * press * slips * noise(around(RUB_SHAPE, hz), len(t)))
    return out


def knife():
    """Handle and blade thump the table and rattle; the steel clinks and rings, its tip lower once it lies flat."""
    out = np.zeros((2, N))
    t = np.arange(SR // 3) / SR
    for s, wood_db, hz, steel_db, tip_db, tip_hz in DROP:
        thump = noise(around(WOOD, hz), len(t)) * amp(-60 * t / 0.051)
        wood = amp(-8.0) * ring(TABLE, t, scatter_db=2.0) + thump
        chatter = grains(rate=1100, spread_db=2.5, t60=0.014, n=len(t))
        scrape = amp(-2 - 60 * t / 0.022) * noise(SLIDING, len(t))
        steel = amp(-6.0) * chatter * ring(BLADE, t, scatter_db=2.5) + scrape
        tip = amp(tip_db - 17 - 60 * t / TIP_T60_S) * chatter * np.sin(2 * np.pi * tip_hz * t)
        metal = amp(steel_db) * steel + tip
        hit = amp(wood_db) * wood * pan(-2.6) + metal * pan(-8.0)
        add(out, s, hit * (1 - np.exp(-t / 0.0005)))
    taps = rng.standard_normal(N) * (rng.random(N) < 600 / SR)
    contacts = gains(RATTLE)[0] * unit(taps)
    # light taps favour the upper modes; the handle damps them
    top = np.gradient(ring(TABLE, t) * amp(-60 * t / 0.054))
    out += signal.fftconvolve(contacts, top / np.linalg.norm(top))[:N]
    # keep the lowest bass out of the knife's thumps and rattle
    low_cut = signal.butter(2, 75, "highpass", fs=SR, output="sos")
    return signal.sosfilt(low_cut, out)


def tears():
    """Breaking fibres build up and stop as the wrapping gives: high in tape, low in loose paper."""
    out = np.zeros((2, N))
    t = np.arange(SR // 5) / SR
    for s, length, db, hz in TEARS:
        pull = np.minimum(t / 0.0085, 1) * amp(-60 * np.maximum(t - length, 0) / 0.014)
        fibres = crackle(around(TEAR_SHAPE, hz), rate=2200, spread_db=3, cycles=0.8, n=len(t))
        add(out, s, amp(db) * pull * fibres)
    return out * pan(-4.0)


def rip():
    """Coarse fibres crackle, fine ones hiss; the tear catches and runs, shaking the flap and the box below."""
    first, last = round(PULL[0][0] * SR), round(PULL[-1][0] * SR)
    n = last - first
    t = np.arange(first, last) / SR
    flap_s, flap_hz, flap_db = np.transpose(FLAP)
    effort, fine = (gain[first:last] for gain in gains(PULL))
    flutter = amp(np.interp(t, flap_s, flap_db))
    nearness = sum(np.exp(-((t - s) / EDGE_WIDTH_S) ** 2) for s in EDGES_S)
    drumming = amp(DRUM_DB + EDGE_DB * nearness)
    flutter_peak_hz = max(FLUTTER, key=lambda point: point[1])[0]

    def flap(s):
        return np.interp(s + first / SR, flap_s, flap_hz) / flutter_peak_hz

    # the tear catches and jerks the sheet; coarse fibres let go in bundles
    tugs = grains(rate=260, spread_db=2, t60=0.05, n=n)
    bundles = crackle(FIBRES, rate=2200, spread_db=3, cycles=0.6, n=n)
    coarse = amp(-5.0) * np.sqrt(tugs) * bending(bundles, depth_db=2.8)
    threads = crackle(FINE_FIBRES, rate=14000, spread_db=3, cycles=0.89, n=n)
    hiss = amp(-1.6) * fine * bending(threads, depth_db=1.5)
    sheet = amp(-3.5) * flutter * crackle(FLUTTER, rate=2000, spread_db=0, cycles=1.87, n=n, bend=flap)
    folds = amp(-13) * crackle(FLEX, rate=700, spread_db=0.5, cycles=0.77, n=n)
    drum = amp(-2.0) * drumming * noise(DRUM, n)
    sound = (coarse + hiss) * pan(-4.0) + tugs * (sheet + folds + drum)
    return np.pad(effort * sound, ((0, 0), (first, N - last)))


def room(x, wet_db, early_db):
    """Near walls answer within milliseconds, then a tail dies away; paths change as the hands move."""
    n, hop = SR // 3, round(MOVE_S * SR)
    out = np.zeros((2, N))
    starts = range(-hop, N, hop)
    # one fading burst of noise per stretch of time serves as its echo pattern
    hiss = noise([(100, -14), (300, 0), (20000, 0)], n * len(starts)).reshape(2, -1, n)
    hz, t, z = signal.stft(hiss, SR, nperseg=256)
    decay = amp(-60 * t / along(ROOM, hz)[:, None]) + amp(early_db - 60 * t / 0.084)
    delay = np.clip(np.arange(n) / SR / 0.003 - 1, 0, 1)  # silent for 3 ms, full after 6 ms
    tails = signal.istft(z * decay, SR, nperseg=256)[1][..., :n] * delay
    padded = np.pad(x, ((0, 0), (hop, 2 * hop)))
    for k, start in enumerate(starts):
        # neighbouring stretches overlap and crossfade
        piece = padded[:, start + hop:][:, :2 * hop] * np.sqrt(np.hanning(2 * hop))
        echo = signal.fftconvolve(piece, tails[:, k] / np.linalg.norm(tails[0, k]), axes=1)
        add(out, start / SR, echo[:, max(-start, 0):])
    return amp(wet_db) * out


def scene():
    """Mix the box, wrapping and knife with their echo and the quiet room."""
    crinkle, flexing, plastic = gestures(STROKES, STROKE_ATTACK_S, STROKE_T60_S)
    parcel = box(flexing) + snaps() + handling(crinkle, flexing, plastic) + rubs() + tears() + rip()
    direct = parcel + knife()
    return direct + room(direct, wet_db=-5.0, early_db=4.0) + amp(HUSH_DB) * noise(HUSH)


def record(dry):
    """The microphone ports colour the treble; peaks clip at full scale and the top of the band is removed."""
    m = next_fast_len(N + SR // 2)
    hz = np.fft.rfftfreq(m, 1 / SR)
    coloured = irfft(rfft(dry, m) * amp(along(MICROPHONE, hz)), m)
    heard = np.clip(coloured, -1, 1)
    return irfft(rfft(heard) * (hz < TOP_HZ), m)[:, :N]


dry = scene()
out = record(dry)
master_out(out)
```